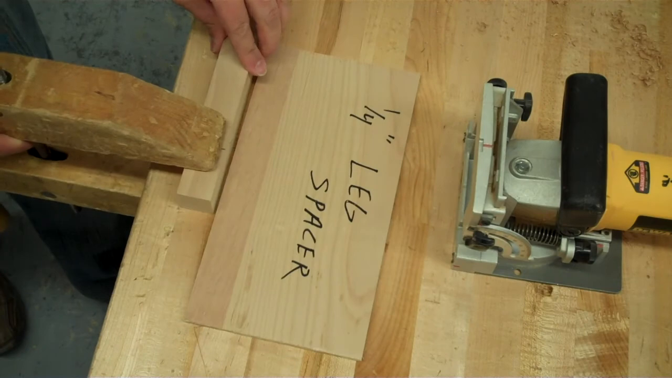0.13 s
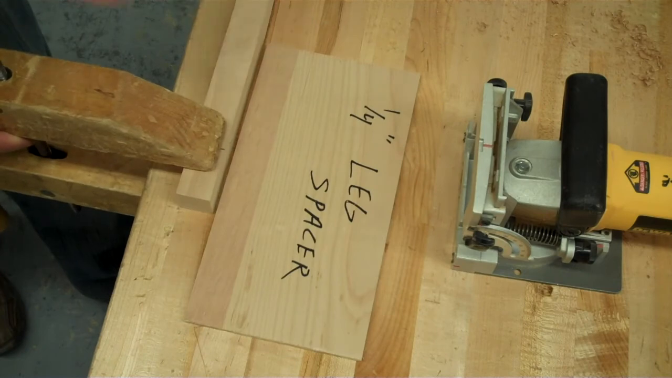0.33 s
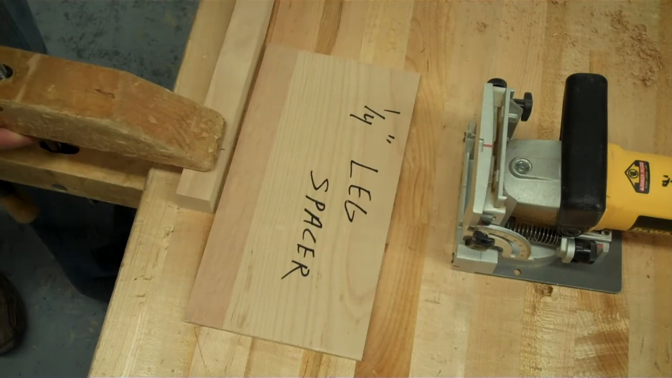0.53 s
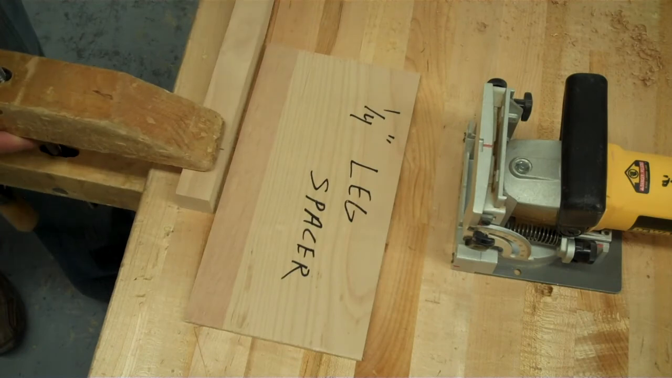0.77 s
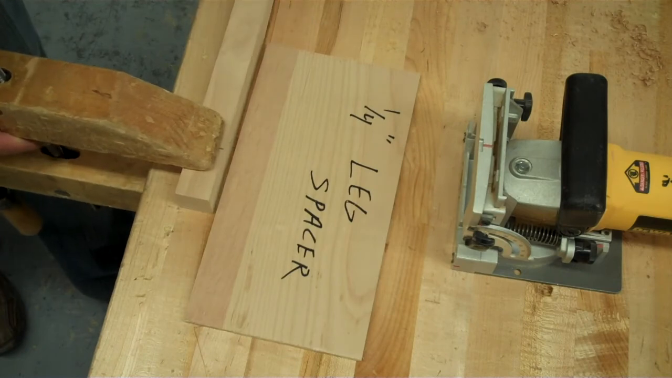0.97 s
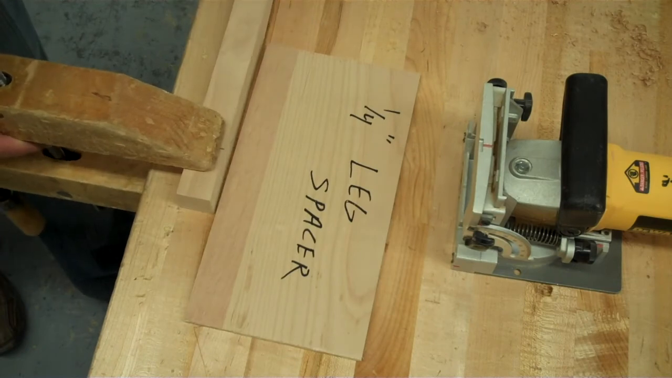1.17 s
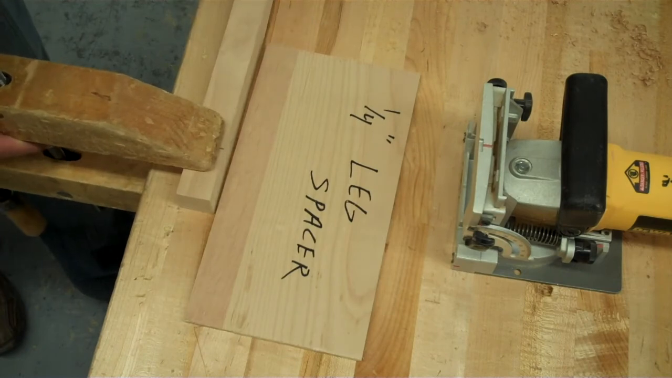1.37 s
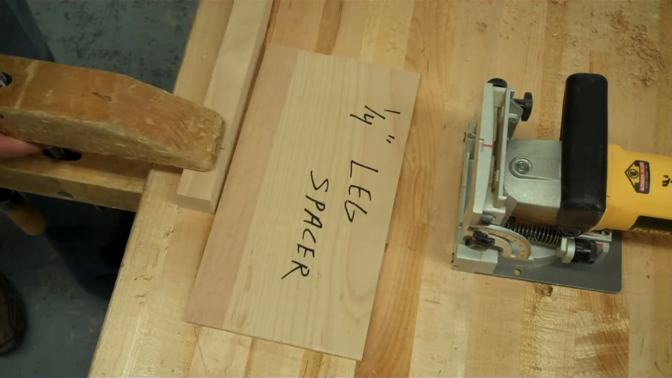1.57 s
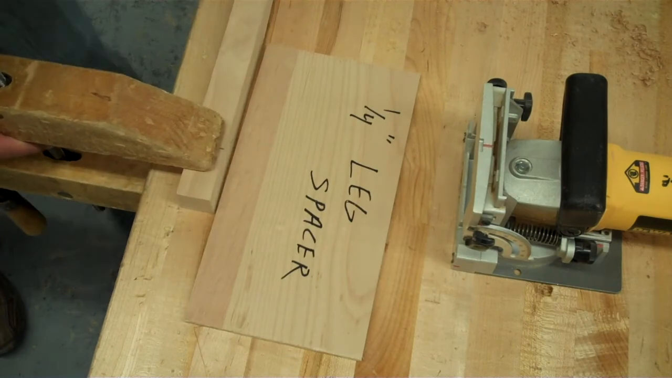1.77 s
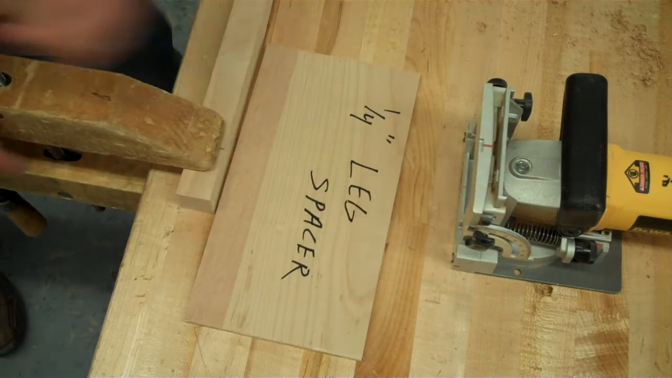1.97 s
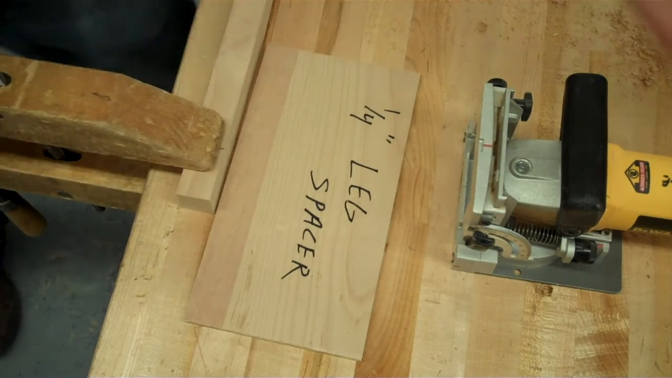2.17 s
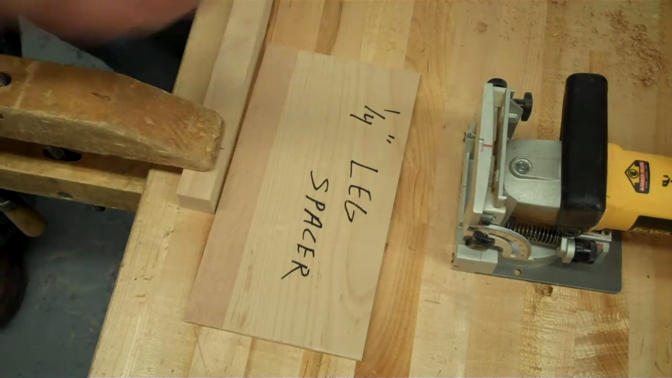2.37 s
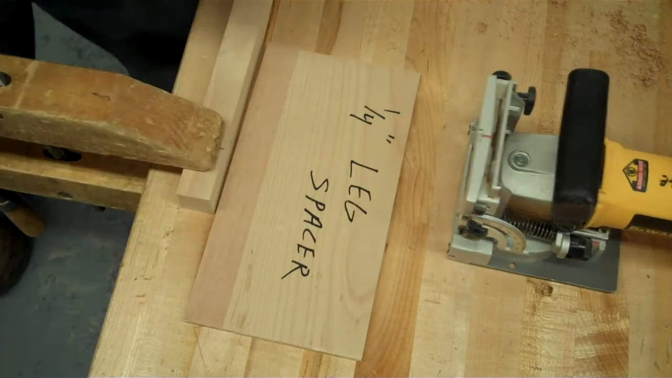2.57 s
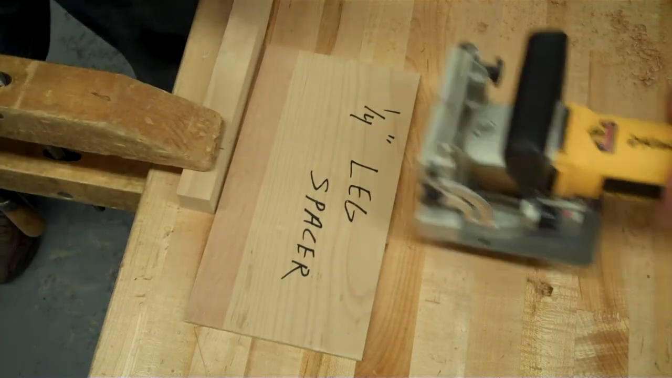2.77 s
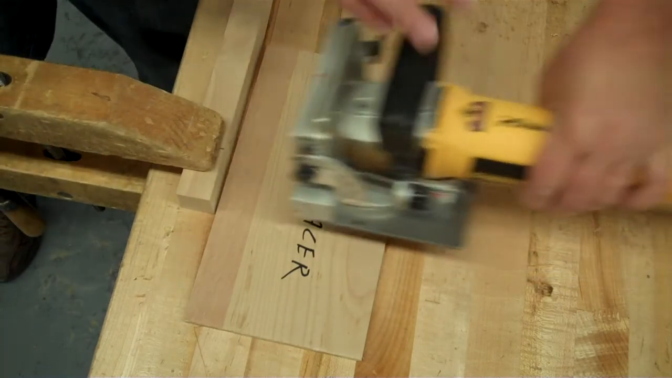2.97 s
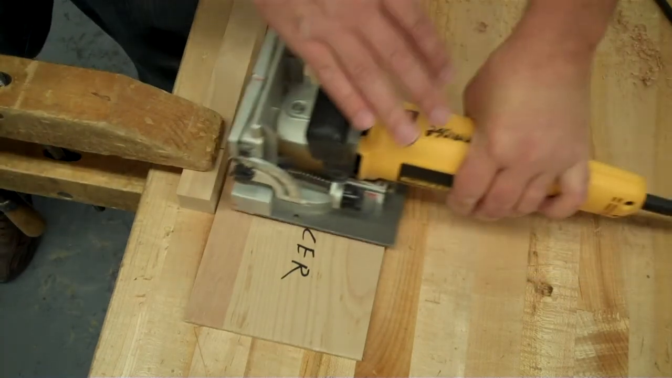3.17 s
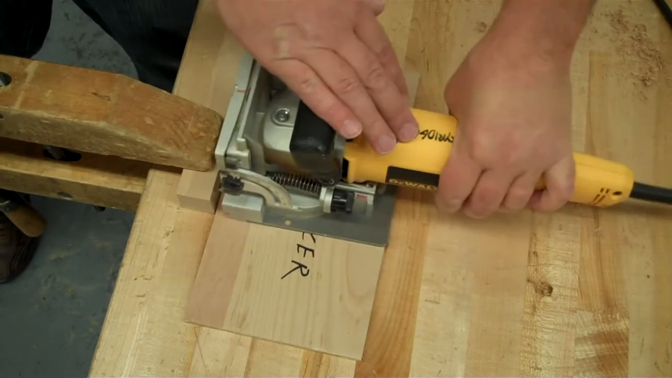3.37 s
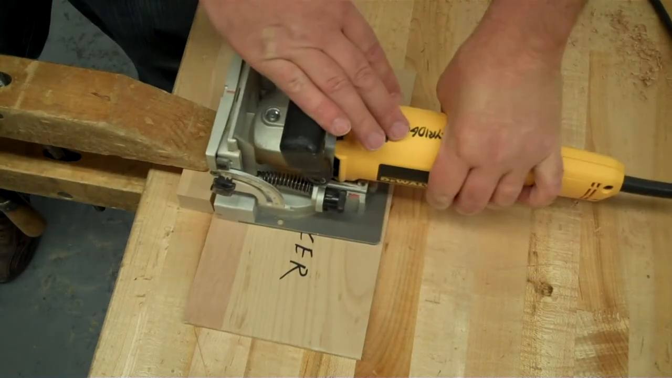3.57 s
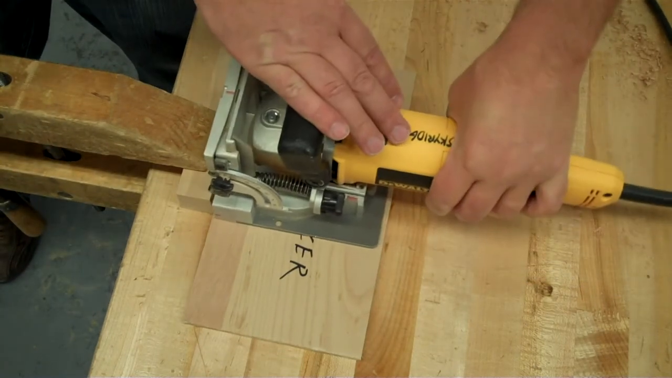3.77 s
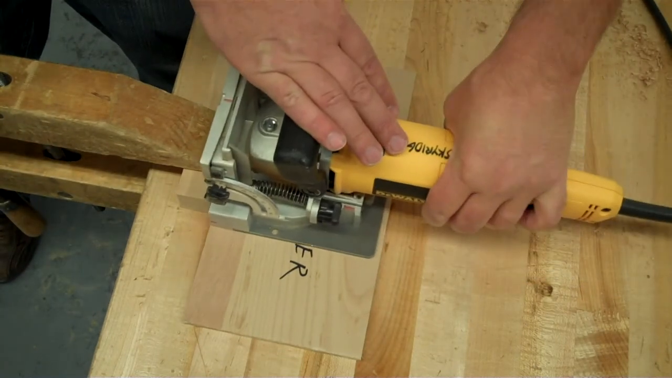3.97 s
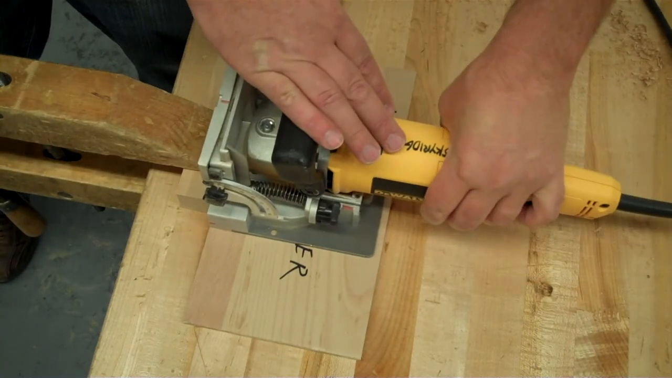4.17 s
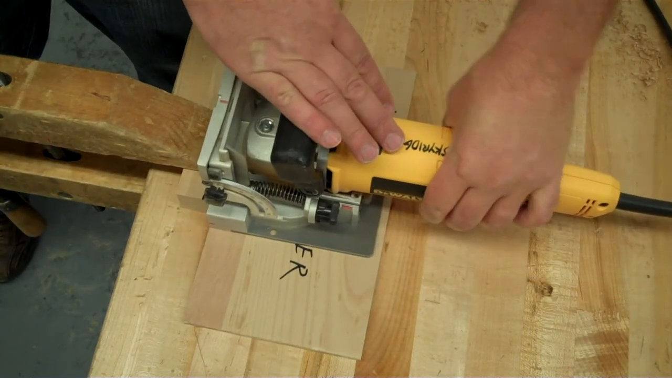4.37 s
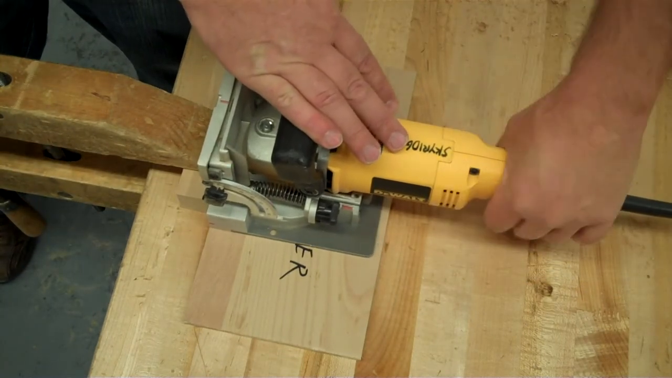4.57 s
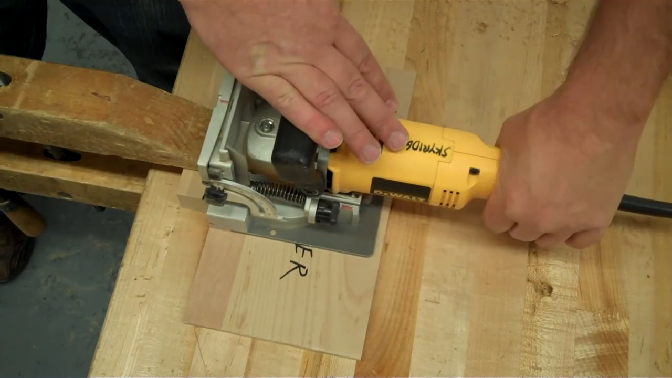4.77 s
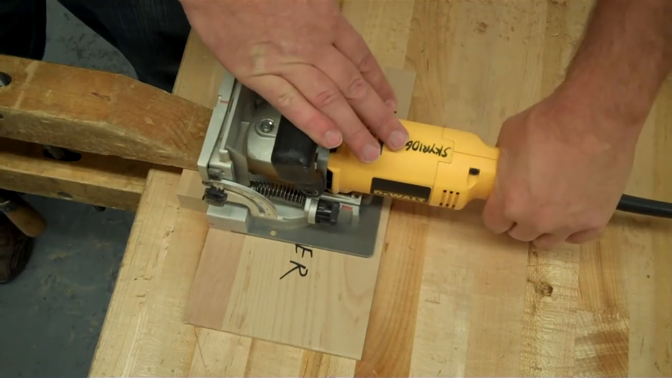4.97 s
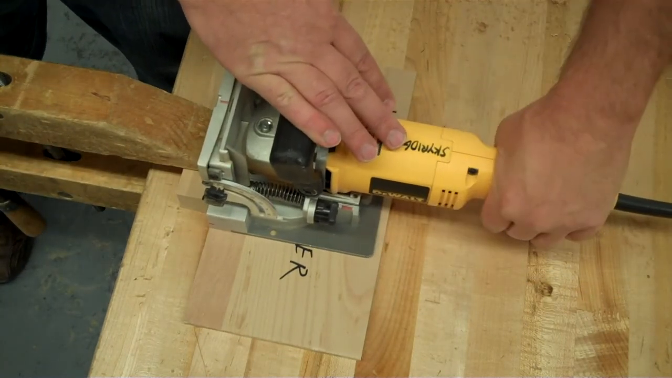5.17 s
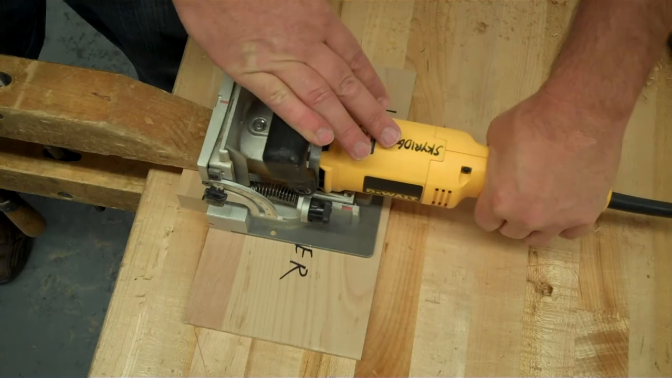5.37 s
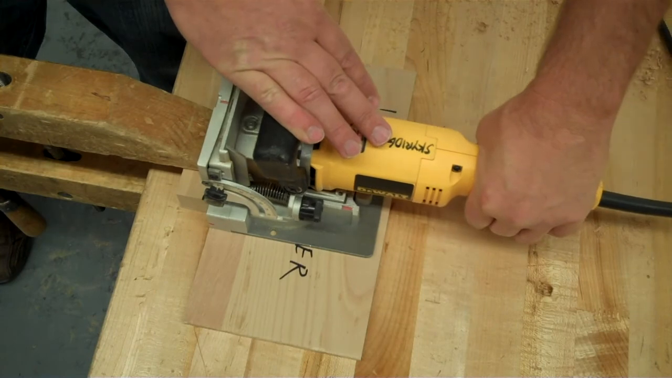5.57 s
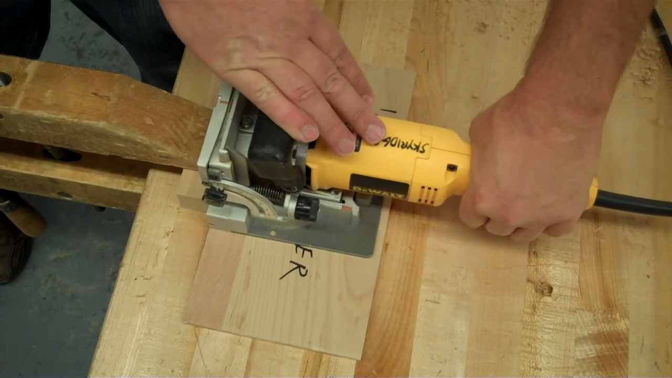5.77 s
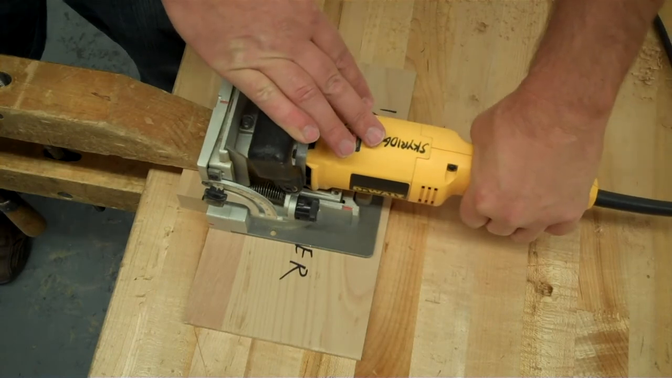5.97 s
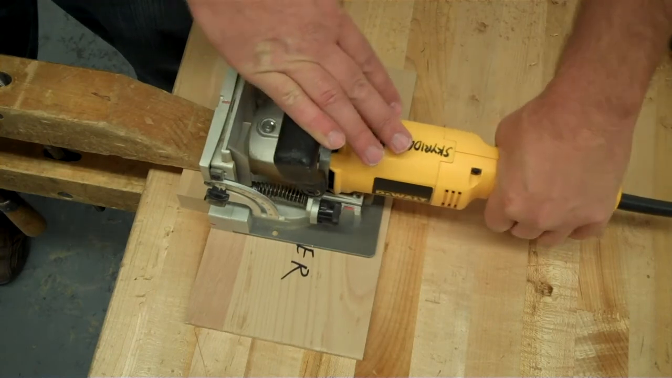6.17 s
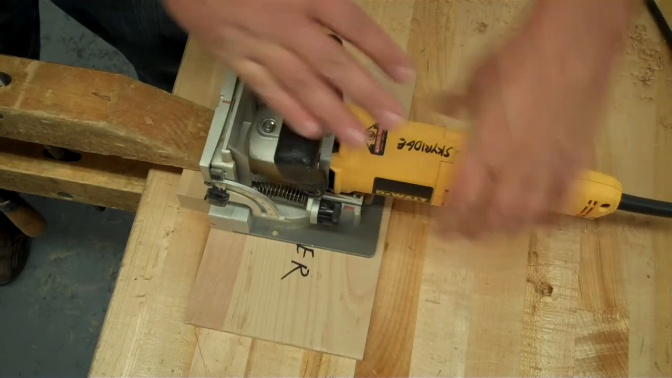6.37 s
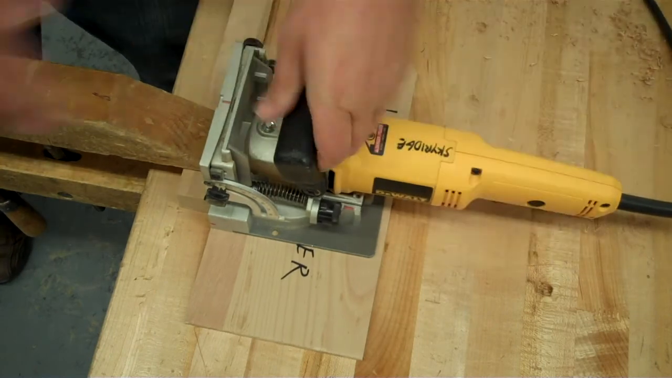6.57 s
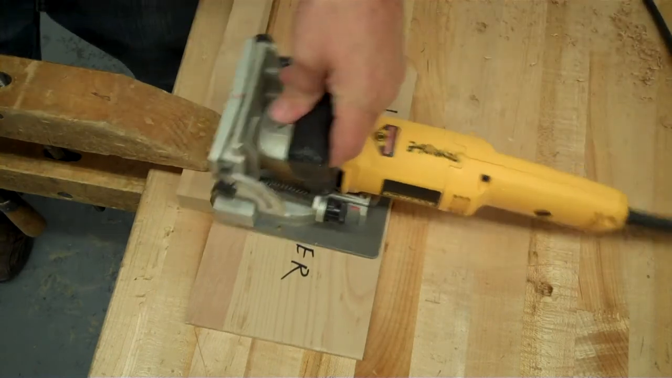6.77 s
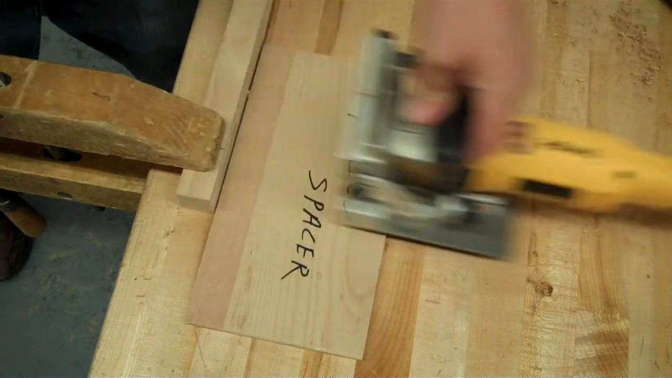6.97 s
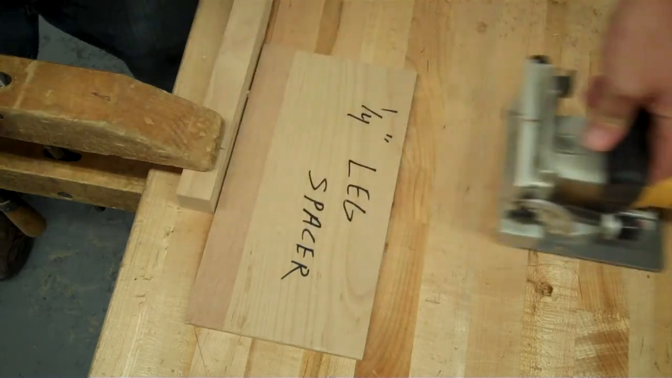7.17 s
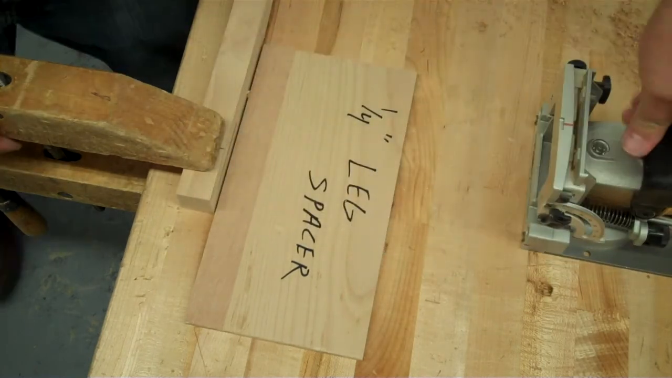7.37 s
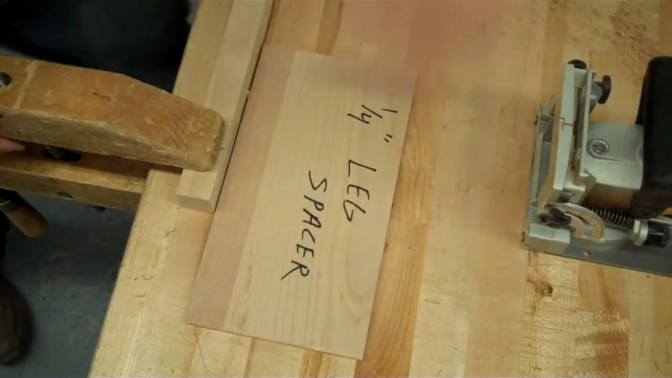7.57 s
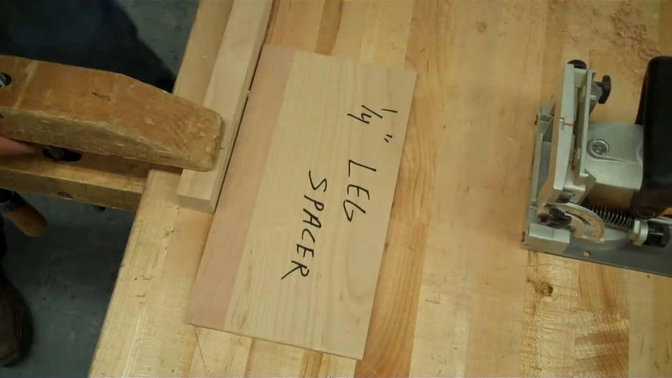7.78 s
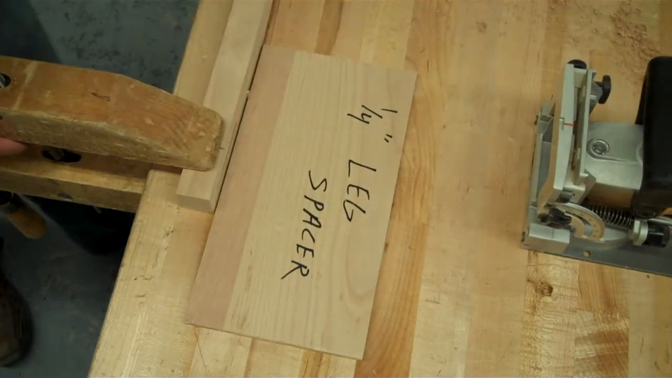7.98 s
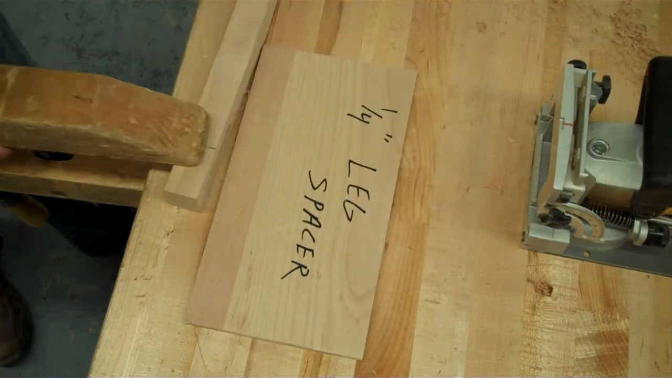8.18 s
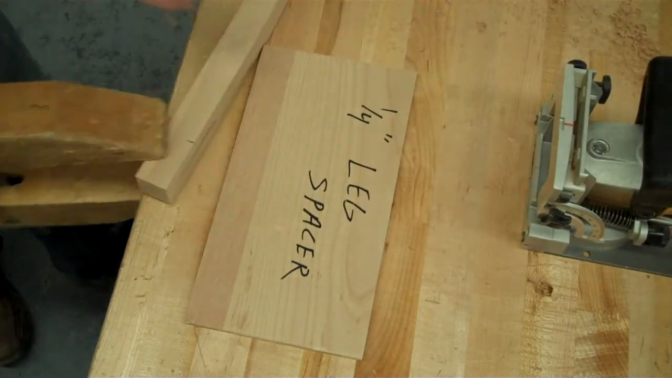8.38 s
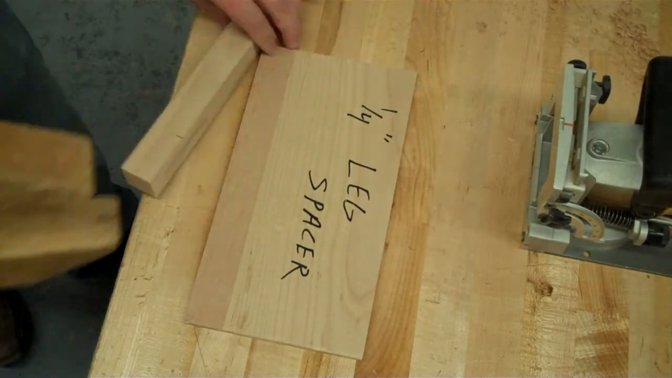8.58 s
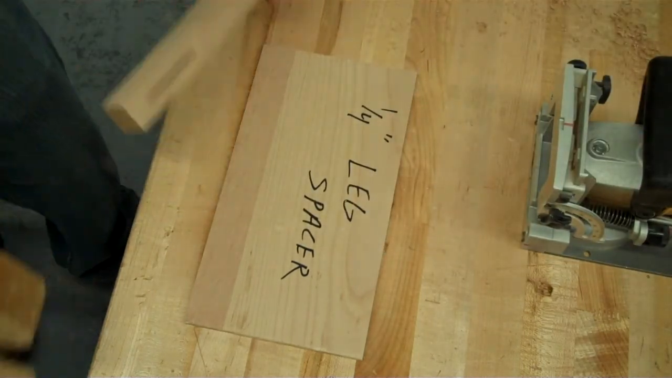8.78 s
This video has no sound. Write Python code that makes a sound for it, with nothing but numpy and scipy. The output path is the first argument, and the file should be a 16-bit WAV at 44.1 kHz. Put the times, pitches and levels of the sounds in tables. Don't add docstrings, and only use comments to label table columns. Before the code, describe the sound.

In a humming workshop, light wood knocks and sliding precede a plate joiner snapping on, whining and growling through hardwood, then coasting down in metallic rattle.

```python
import sys
import numpy as np
from scipy import signal
from scipy.fft import rfft, irfft, next_fast_len
from scipy.io import wavfile
from scipy.ndimage import uniform_filter1d

SR = 44100
rng = np.random.default_rng(int(sys.argv[2]) if len(sys.argv) > 2 else 0)


def gain_from_db(level_db):
    decades = np.asarray(level_db, float) / 20
    return 10 ** decades


def unload_audio(sound):
    columns = np.transpose(np.atleast_2d(sound))
    steps = np.round(np.clip(columns, -1, 1) * 32767)
    wavfile.write(sys.argv[1], SR, steps.astype(np.int16))


N = 388942
T = np.arange(N) / SR
HZ = np.maximum(np.fft.rfftfreq(next_fast_len(N, True), 1 / SR), 1)

ON_S, SWITCH_OFF_S = 4.936, 6.315
MAINS_PULSE_HZ, FIRST_PULSE_S = 120, 4.9785

# (time [s], mesh pitch [Hz], tooth load [dB])
MESH = [(4.98, 1927, -4), (5.075, 3780, -1), (5.115, 4120, 0), (5.2, 4740, 3), (5.3, 5224, 1.5),
        (5.385, 5525, 1.5), (5.48, 5570, 1), (5.545, 5493, 1), (5.625, 5190, -4), (5.73, 4412, 10),
        (5.85, 4854, -14), (5.97, 5284, 0), (6.19, 5817, 2.5), (6.315, 6076, -2.5), (6.73, 5117, -0.5),
        (7.25, 3868, -10), (7.8, 2755, -1.5), (8.82, 1120, -22)]
# (time [s], peak level [dB])
EARLY_RATTLE = [(6.442, -23), (6.47, -14), (6.4871, -19), (6.5187, -30), (6.5938, -23), (6.6283, -20),
                (6.6469, -19), (6.6718, -8), (6.6954, -10), (6.7178, -13), (6.7416, -12), (6.762, -10.5),
                (6.775, -14), (6.8166, -13), (6.7924, -11), (6.8438, -10), (6.868, -11.5), (6.892, -9.5),
                (6.9056, -12.5), (6.9253, -17), (6.95, -12), (6.9662, -14), (6.987, -9), (7.0034, -16),
                (7.0324, -14), (7.0569, -6.5), (7.0787, -8), (7.1326, -10), (7.1574, -8), (7.172, -7),
                (7.199, -18)]
# (frequency [Hz], level [dB], t60 [s])
HOUSING = [(1052, -5, 0.028), (1660, -14, 0.074), (2008, -4.5, 0.058), (2380, 6.5, 0.0046),
           (2940, 3, 0.0095), (3170, 7.5, 0.0053), (4610, -6, 0.027), (5480, 5.5, 0.0062),
           (5830, 6.5, 0.016), (6160, 6, 0.019), (6480, 0.5, 0.029), (7420, -3, 0.046), (7700, -5, 0.076),
           (8260, -2, 0.02), (9600, -10.5, 0.037), (9590, -6, 0.038), (12000, -22, 0.038)]
# (frequency [Hz], likeness [-1..1])
ROOM_ALIKE = [(60, 0.81), (130, 0.97), (290, 0.97), (630, 0.87), (1390, 0.59), (3050, 0.22), (6690, 0.041),
              (14700, -0.85)]
TOOL_ALIKE = [(60, 0.64), (130, 0.61), (290, 1), (630, 1), (1390, 1), (3050, 1), (6690, 0.5), (14700, 0.43)]
# (frequency [Hz], balance [dB])
ROOM_SIDE = [(60, -2), (180, 0.5), (540, -0.5), (1630, 2), (4890, -1), (14700, 18.5)]
RUN_SIDE = [(60, -7), (240, -3.5), (940, 0), (3700, 0), (6200, -1), (7300, 7), (8800, 20), (14700, 26)]
COAST_SIDE = [(60, -10), (99, -4), (160, 4), (270, 0), (440, 5), (730, 13), (1210, 0.5), (1990, -2),
              (3280, 6.5), (5400, -6), (8900, 17), (14700, 35.5)]


def in_time(rows):
    s, *columns = np.transpose(rows)
    return [np.interp(T, s, c) for c in columns]


def at_hz(points, hz):
    table_hz, values = np.array(points).T
    return np.interp(np.log(hz), np.log(table_hz), values)


def rms_one(x):
    return x / np.sqrt(np.mean(x ** 2) + 1e-20)


def band(x, low_hz, high_hz):
    sos = signal.butter(3, [low_hz, high_hz], "band", fs=SR, output="sos")
    return rms_one(signal.sosfilt(sos, x))


def drift(rate):
    r = np.exp(-80 * np.pi * rate / SR)
    slow = signal.lfilter([1], [1, -2 * r, r * r], rng.standard_normal(N // 40 + 2002))[2000:]
    return np.interp(np.arange(N) / 40, np.arange(len(slow)), rms_one(slow))


def noise(colour, alike, balance, modes=(), lift=0):
    size = next_fast_len(N, True)
    mid, side = rfft(rng.standard_normal((2, size)))
    c, sign = np.clip(at_hz(alike, HZ), -1, 1), np.array([[1], [-1]])
    pair = np.sqrt(1 + c) * mid + sign * np.sqrt(1 - c) * side
    pair = pair * gain_from_db(sign * at_hz(balance, HZ) / 2)
    peaks = 1 + lift * sum(gain_from_db(2 * db) * t60 / (1 + ((HZ - hz) * t60 / 1.1) ** 2) for hz, db, t60 in modes)
    return rms_one(irfft(pair * gain_from_db(at_hz(colour, HZ)) * np.sqrt(peaks), size)[:, :N])


def ring(clicks, hz, t60):
    r, w = gain_from_db(-60 / (t60 * SR)), 2 * np.pi * hz / SR
    return signal.lfilter([0, np.sin(w)], [1, -2 * r * np.cos(w), r * r], clicks + 1e-18)


def burst(clicks, rise_s, t60):
    a, r = np.exp(-1 / (rise_s * SR)), gain_from_db(-60 / (t60 * SR))
    fall = signal.lfilter([1], [1, -r], clicks + 1e-18)
    return signal.lfilter([1 - a], [1, -a], fall)


def switch():
    return np.clip((T - ON_S) / 0.00081, 0, 1)


def since_on():
    return np.maximum(T - ON_S, 0)


def cut(late_s=0):
    deepest_s, half_s = 5.73, 0.17
    return np.exp(-((T - deepest_s - late_s) / half_s) ** 2)


def lost_speed():
    free_mesh_hz = 5550
    return np.minimum(20 * np.log10(in_time(MESH)[0] / free_mesh_hz), 0) * (T > SWITCH_OFF_S)


def slaps():
    # (time [s], peak level [dB])
    lone = [(4.9335, -7), (4.9375, 9.5), (4.942, -22), (5.3293, -5), (5.6032, -15), (5.6401, -14),
            (5.6855, -5), (5.7384, -21), (5.7703, -17), (5.7893, -16), (5.8062, -19), (5.8327, -15),
            (5.8796, -20), (5.8975, -6), (5.9404, -12), (6.0312, -8), (6.0647, -8), (7.215, -9),
            (7.399, -8), (7.874, -10), (8.159, -10), (8.3009, -8), (8.389, -5.5), (8.4, -7), (8.5707, -6),
            (8.663, -5.5), (8.705, -14), (8.74, -5), (8.778, -12), (8.817, -3.5)]
    # (time [s], peak level [dB])
    bounces = [(7.1983, -8.5), (7.2485, -9), (7.2716, -8), (7.2993, -5), (7.3242, -6.5), (7.341, -7),
               (7.3675, -8.5), (7.3849, -5.5), (7.4253, -10.5), (7.4395, -7.5), (7.4555, -6.5),
               (7.4737, -7.5), (7.4972, -7.5), (7.5243, -8), (7.552, -7), (7.576, -10), (7.6043, -8.5),
               (7.6294, -8), (7.658, -8), (7.6846, -10.5), (7.7132, -8), (7.7401, -8.5), (7.765, -6),
               (7.7895, -8), (7.8151, -7), (7.8454, -13.5), (7.8584, -5.5), (7.8928, -12), (7.9218, -5.5),
               (7.9474, -7.5), (7.9784, -8.5), (8.0085, -9.5), (8.0375, -7), (8.0651, -12), (8.0857, -8),
               (8.1136, -7.5), (8.1376, -9), (8.168, -6.5), (8.1984, -7), (8.223, -9), (8.253, -8.5),
               (8.2812, -8), (8.3199, -9), (8.3463, -4.5), (8.3767, -8), (8.428, -8), (8.458, -8.5),
               (8.4804, -9), (8.5029, -7.5), (8.5291, -7), (8.5543, -11), (8.5872, -9.5), (8.6097, -10.5),
               (8.6304, -10.5), (8.647, -10), (8.6912, -7), (8.7185, -16.5), (8.7466, -16), (8.7727, -8),
               (8.7967, -12.5)]
    return np.vstack([lone, np.add(bounces, [0, 3.5]), np.add(EARLY_RATTLE, [0, 4.5])]).T


def whine():
    # (frequency [Hz], level [dB])
    mesh_response = [(2250, -33), (2650, -30.5), (3240, -26), (3340, -38), (3560, -34), (3800, -25.5),
                     (4000, -42), (4500, -53), (4800, -32), (5090, -21.5), (5870, -13.5)]
    # (frequency [Hz], level [dB])
    octave_response = [(4300, -50), (4600, -39), (5050, -35), (5400, -37), (5560, -50), (6000, -45),
                       (6500, -39), (7500, -40), (8400, -36), (9600, -42), (10800, -42), (12100, -45)]
    # (frequency [Hz], level [dB])
    tick_response = [(1800, -24), (2400, -13), (2750, -4), (3300, -3), (3800, -24), (5100, -20), (5600, -6),
                     (6300, -4), (7000, -14), (8200, -28), (9500, -70)]
    # (multiple of mesh pitch [ratio], level [dB])
    tick_orders = [(1.9, -3.5), (3.8, -4)]
    # (multiple of mesh pitch [ratio], level [dB], start [s], end [s])
    shaft_orders = [(.046, -43, 5.5, 6.2), (.08, -35, 5.57, 5.69), (.07, -39, 5.28, 5.38),
                    (.09, -37, 5.07, 5.14), (.046, -43, 5.7, 5.8), (.078, -52, 7.65, 7.95),
                    (.142, -37, 6.15, 6.72), (.142, -43, 6.8, 7.1), (.142, -45, 7.2, 7.4),
                    (.284, -44, 6.35, 6.7), (.284, -40, 7.3, 7.6), (.426, -47, 7.45, 7.75),
                    (.923, -32, 5.36, 5.56), (.923, -35, 5.03, 5.06), (.923, -22, 5.095, 5.135),
                    (.923, -29, 5.18, 5.3), (.855, -33, 5.33, 5.6), (.923, -31, 5.63, 5.98),
                    (.923, -31, 6.04, 6.3), (.95, -33, 5.82, 6.05)]
    octave_powered_db = -3
    beat_share, beat_fade_s = .85, .7
    slap_load = 1.2

    hz, load_db = in_time(MESH)
    hz = uniform_filter1d(hz, size=1600)
    turn = 2 * np.pi * np.cumsum(hz * (1 + 0.000987 * drift(21.3))) / SR
    powered = T < SWITCH_OFF_S
    pulses = np.cos(2 * np.pi * MAINS_PULSE_HZ * (T - FIRST_PULSE_S))
    beat = beat_share * pulses * np.exp(-since_on() / beat_fade_s) * powered

    s, db = slaps()
    coasting = s > SWITCH_OFF_S
    blows = np.zeros(N)
    blows[(s[coasting] * SR).astype(int)] = gain_from_db(db[coasting])

    mesh_db = load_db + at_hz(mesh_response, hz)
    mesh_db = mesh_db + 20 * np.log10(1 + beat + slap_load * burst(blows, .001, .06))
    mesh_db = mesh_db + 0.51 * drift(5.4) + 0.55 * drift(29) + 2.8 * drift(510)
    octave_db = at_hz(octave_response, 2 * hz) + octave_powered_db * powered
    octave_db = octave_db + 3 * drift(35) + 1.7 * drift(300)
    lines = [(1, mesh_db), (2, octave_db)]

    tick_db = 20 * np.log10(abs(burst(blows, 0.00042, 0.013)) + 1e-9)
    lines += [(k, db + tick_db + at_hz(tick_response, k * hz)) for k, db in tick_orders]

    waver_db = 1.5 * drift(20) + 3 * drift(150) + 20 * np.log10(1 + beat)
    for n, (k, db, t0, t1) in enumerate(shaft_orders):
        fade_db = np.interp(T, [t0 - .1, t0, t1, t1 + .1], [-40, 0, 0, -40])
        own_waver_db = min(1, .3 + k) * np.roll(waver_db, 2205 * (n % 3))
        lines.append((k, db + fade_db + own_waver_db))

    out = np.zeros((2, N))
    for k, db in lines:
        on = (T > MESH[0][0]) & (db > -75)
        pan_db = np.where(T[on] < 7, at_hz(RUN_SIDE, k * hz[on]), at_hz(COAST_SIDE, k * hz[on])) / 2
        tone = np.sin(k * turn[on] + [[0], [0.75 * k]])
        out[:, on] += np.sqrt(2) * gain_from_db(db[on] + [pan_db, -pan_db]) * tone
    return out


def whir():
    # (level [dB], share of effort [dB/dB], share of lost speed [dB/dB], change in the cut [dB])
    ranges = [
        (-27.5, 0.41, 0.72, -6.5),
        (-25, 1.7, 0.73, -5),
        (-20, 3.1, 1, -2),
        (-27.5, 4.7, 0.53, -4),
    ]
    edges_hz = [450, 1500, 4500, 7000, 16000]
    # (frequency [Hz], density [dB per Hz])
    colour = [(180, -56), (300, 4), (371, -14), (467, -4), (841, -1), (2100, -8), (3550, -9.5),
              (6000, -10.5), (6950, -9), (7540, -2), (13800, -18.5), (15000, -59)]
    # (time [s], level [dB])
    effort_curve = [(4.95, -0.5), (5.05, 0.5), (5.12, 1), (5.46, 0.5), (5.9, 1), (6.25, -0.5), (7.1, 0),
                    (7.2, 0.5), (7.46, -1.5)]
    hiss_top_fades_s = (6.8, 7.4)
    hiss_top_edge_hz, hiss_top_db, hiss_top_loss_db = 10400, -6, -19
    hammer_db, hammer_fade_s, hammer_left_db = 14, .12, 1.5
    uneven_db = .6
    swell_db, swell_early_s = -24.5, 0.09

    raw = noise(colour, TOOL_ALIKE, RUN_SIDE, HOUSING, lift=110)
    below = signal.sosfiltfilt(signal.butter(4, hiss_top_edge_hz, fs=SR, output="sos"), raw)
    raw = below + (raw - below) * gain_from_db(hiss_top_db + np.interp(T, hiss_top_fades_s, [0, hiss_top_loss_db]))

    cycle = (T - FIRST_PULSE_S) * MAINS_PULSE_HZ
    strength = rng.uniform(.5, 1.5, 2000)[np.floor(cycle).astype(int) % 2000]
    pulse = strength * np.exp(-(cycle % 1) / 0.5) - .55
    beat_db = (hammer_db * np.exp(-since_on() / hammer_fade_s) + hammer_left_db) * pulse
    flutter_db = 1.06 * drift(120) + 0.48 * drift(6.7)

    effort, lost, depth = in_time(effort_curve)[0], lost_speed(), cut()
    out = np.zeros((2, N))
    for (db, work, slow, cut_db), low_hz, high_hz in zip(ranges, edges_hz, edges_hz[1:]):
        level_db = db + work * effort + slow * lost + cut_db * depth
        out += gain_from_db(level_db + uneven_db * drift(2.3)) * band(raw, low_hz, high_hz)
    hiss = band(rng.standard_normal(N), 8200, 9650)
    out += gain_from_db(swell_db) * hiss * cut(-swell_early_s) * gain_from_db([[5], [-9]])
    return out * gain_from_db(beat_db + flutter_db) * switch()


def rattle():
    # (frequency [Hz], density [dB per Hz])
    colour = [(180, -42), (300, 4), (1040, -3), (1470, 15.5), (2690, 12), (4120, -6.5), (6300, 3.5),
              (7670, 0), (8880, -21.5), (9640, -12), (10500, -33), (12100, -18), (15000, -61)]
    low_share_db, low_per_db = -25.5, 0.9754
    second_db, second_spread_db = -12, 4
    sharp_share = 2.6

    s, db = slaps()
    at = (s * SR).astype(int)
    luck = rng.normal(0, 1, (200, len(HOUSING) + 3))[:len(s)]
    low_db = low_share_db - low_per_db * lost_speed()[at] + 0.71 * luck[:, -3]
    late = at + (SR * (0.0031 + 0.00186 * abs(luck[:, -1]))).astype(int)
    late_db = second_db + second_spread_db * luck[:, -2]

    first = at.min() - 1
    crack = noise(colour, TOOL_ALIKE, COAST_SIDE)[:, first:]
    grit = rng.standard_normal(N - first)
    out = np.zeros((2, N))

    def train(level_db):
        clicks = np.zeros(N + SR)
        clicks[at], clicks[late] = gain_from_db(level_db), gain_from_db(level_db + late_db)
        return clicks[first:N]

    for low_hz, high_hz, level_db in ((300, 4000, db + low_db - 3.0), (4000, 16000, db - 11.5)):
        out[:, first:] += band(crack, low_hz, high_hz) * burst(train(level_db), 0.00034, 0.023)
    for k, (hz, mode_db, t60) in enumerate(HOUSING):
        edge = train(db + (low_db + 13.5) * (hz < 4000) + mode_db - 32.0 + 2.3 * luck[:, k])
        scuff = burst(edge, 0.0005, 0.006) * np.roll(grit, 997 * k)
        tone = ring(scuff + sharp_share * edge * (-1) ** k, hz, t60)
        pan_db = at_hz(COAST_SIDE, hz) / 2
        out[:, first:] += [gain_from_db(pan_db) * tone, gain_from_db(-pan_db) * np.roll(tone, k % 3)]
    return signal.sosfilt(signal.butter(4, [350, 12500], "band", fs=SR, output="sos"), out)


def early_clicks():
    hz, t60, until_s = 4820, .011, 6.93
    s, db = np.transpose([row for row in EARLY_RATTLE if row[0] < until_s])
    clicks = np.zeros(N)
    clicks[(s * SR).astype(int) + 40] = gain_from_db(db + 1)
    return ring(clicks, hz, t60) - .6 * ring(clicks, 1.2 * hz, t60 / 2)


def kicks():
    # (time [s], peak level [dB])
    pulse_kicks = [(4.9534, -9), (4.961, -3), (4.9784, -2.5), (4.9852, -2), (4.9948, -3), (5.0034, -8),
                   (5.013, -7), (5.021, -1), (5.029, -10), (5.0364, -13), (5.046, -9), (5.0534, -8),
                   (5.062, -4), (5.072, -5), (5.083, -5), (5.0894, -5), (5.0966, -4), (5.188, -7),
                   (5.197, -7), (5.231, -15), (5.242, -6)]
    # (frequency [Hz], density [dB per Hz])
    colour = [(600, -37), (1200, -6), (2500, -3.5), (4300, 4.5), (5300, 7), (6300, 2), (7200, -19.5),
              (10000, -9), (15000, -47)]
    s, db = np.transpose(pulse_kicks)
    clicks = np.zeros(N)
    clicks[(s * SR).astype(int)] = gain_from_db(db - 5)
    return noise(colour, TOOL_ALIKE, RUN_SIDE) * burst(clicks, 0.00023, 0.024)


def bench(modes):
    kick_db, kick_fade_s = 14.5, 0.85
    cut_db, cut_late_s = 6.5, 0.19
    hum_db, hum_fade_db_per_s = -30.5, 82

    shake = noise([(60, -18.0), (150, -14.5), (500, 9)], TOOL_ALIKE, RUN_SIDE, modes, lift=330)
    shake = band(shake, 97, 477)
    kick = np.exp(-(since_on() / kick_fade_s) ** 2)
    level_db = -45.5 + kick_db * kick + cut_db * cut(cut_late_s) + 2.0 * drift(7.9)
    hum = gain_from_db(hum_db - hum_fade_db_per_s * since_on()) * np.sin(2 * np.pi * MAINS_PULSE_HZ * T)
    return (gain_from_db(level_db) * shake + hum) * switch()


def knocks(modes):
    # (time [s], peak level [dB], bright centre [Hz], low thump [dB], t60 [s])
    hits = [(0.409, -41, 1530, -41, .04), (0.515, -37, 1950, -43, 0.03), (0.594, -50, 1520, -38, 0.037),
            (0.641, -57, 1520, -42, 0.037), (0.971, -36.5, 1510, -40, 0.054),
            (1.061, -30.5, 880, -36.5, 0.053), (1.248, -46, 1540, -50, 0.05),
            (1.744, -17.5, 2430, -43, 0.012), (1.854, -27, 4500, -54, 0.013), (2.591, -16, 920, -28, 0.059),
            (2.596, -14, 2500, -26.5, 0.027), (2.674, -36, 2600, -63, .02), (2.62, -37, 900, -35, 0.055),
            (2.672, -31, 1090, -31, 0.06), (3.012, -36, 7550, -61, 0.033), (3.22, -23.5, 2430, -53, 0.034),
            (3.221, -22, 1150, -59, 0.04), (3.5, -43, 960, -45, .04), (3.814, -31, 8700, -63, 0.024),
            (3.903, -39, 7000, -60, .03), (4.111, -35, 7500, -60, .015), (4.136, -20, 3180, -54, 0.028),
            (4.148, -33, 6500, -58, .012), (4.336, -46, 1230, -38, 0.054), (4.839, -39, 2640, -52, 0.045),
            (4.935, 9, 2450, -24, 0.037), (7.191, -7.5, 1120, -21.5, 0.11), (7.301, -9, 1120, -33, 0.058),
            (7.323, -10, 1090, -39, 0.065), (7.95, -36, 1097, -31, 0.053), (8.53, -40, 1101, -32.5, 0.054)]
    size = 20000
    t = T[:size]
    out = np.zeros((2, N + size))
    for s, db, hz, thump_db, t60 in hits:
        mid, side = rng.standard_normal((2, size))
        fade = (1 - np.exp(-t / 0.0013)) * gain_from_db(-60 * t / max(t60, .005))
        tick = band(mid + 0.3 * side * [[1], [-1]], max(hz / 3.1, 300), min(hz * 2.77, 12000))
        rings = np.clip((1250 / hz) ** 1.9, 0, 1)
        body = band(side, hz / 1.104, hz * 1.08)
        tick = (1.1 - 0.44 * rings) * tick + 0.3 * rings * body
        clack = np.sin(2 * np.pi * hz * t) * 1.43 * rings * gain_from_db(-60 * t / 0.054)
        thump = np.zeros(size)
        for mode_hz, mode_db, mode_t60 in modes:
            strength = gain_from_db(mode_db + rng.normal(0, 1.5))
            tone = np.sin(2 * np.pi * (mode_hz * t + rng.random()))
            thump += strength * tone * gain_from_db(-60 * t / mode_t60)
        thump *= (1 - np.exp(-t / 0.0019)) ** 2
        i = round(s * SR)
        out[:, i:i + size] += gain_from_db(db - 5.0) * (tick + clack) * fade + gain_from_db(thump_db - 4.0) * thump
    return out[:, :N]


def pings():
    # (time [s], pitch [Hz], peak level [dB], t60 [s])
    notes_struck = [(0.516, 2010, -39, 0.029), (1.855, 4240, -32, .02), (1.854, 4870, -34, 0.021),
                    (2.596, 1940, -31, 0.059), (2.596, 2530, -30, 0.039), (2.597, 2940, -23.5, 0.026),
                    (2.673, 1970, -45, 0.079), (4.975, 1887, -4, 0.042)]
    out = np.zeros(N)
    for s, hz, db, t60 in notes_struck:
        t = np.maximum(T - s, 0)
        out += gain_from_db(db - 60 * t / t60) * (1 - np.exp(-t / 0.00038)) * np.sin(2 * np.pi * hz * t)
    return out


def slides():
    # (middle [s], half length [s], centre [Hz], level [dB])
    strokes = [(.45, 0.21, 6600, -57.5), (1.022, 0.064, 4100, -53), (1.338, 0.024, 8060, -46.5),
               (1.933, 0.11, 5360, -49.5), (2.025, 0.25, 2015, -55), (2.21, 0.11, 3820, -47.5),
               (2.439, 0.045, 7250, -38), (2.488, 0.22, 4860, -46), (2.743, 0.21, 6800, -54.5),
               (3.014, 0.065, 7630, -45), (3.205, 0.07, 7550, -45.5), (3.426, 0.12, 6800, -49.5),
               (3.933, 0.12, 8100, -47), (4.153, 0.037, 7550, -49.5), (4.514, 0.04, 5970, -46),
               (4.61, 0.042, 5400, -49)]
    raw = noise([(1000, 15), (9000, 8), (14000, -23)], ROOM_ALIKE, ROOM_SIDE)
    raw = raw * gain_from_db(1.9 * drift(120) + .9 * drift(22))
    out = np.zeros((2, N))
    for s, half_s, hz, db in strokes:
        near = abs(T - s) < 3 * half_s
        swell = np.exp(-((T[near] - s) / half_s) ** 2)
        out[:, near] += gain_from_db(db) * band(raw[:, near], hz / 1.51, hz * 2.0) * swell
    return out


def shop(x):
    size = next_fast_len(N + SR)
    hz = np.fft.rfftfreq(size, 1 / SR)
    t60 = 0.34 / (1 + hz / 6000)
    out = []
    for side in x:
        delays_s = rng.uniform(.006, .03, 10)
        loops = [gain_from_db(-60 * d / t60) * np.exp(-2j * np.pi * hz * d) for d in delays_s]
        response = sum((-1) ** k * g / (1 - g) for k, g in enumerate(loops))
        out.append(irfft(rfft(side, size) * response, size)[:N])
    return np.array(out)


def room_noise():
    # (frequency [Hz], density [dB per Hz])
    colour = [(12, -51), (20, -19), (189, 0.5), (278, -6), (357, -2), (409, -5), (889, -10.5), (966, -12),
              (1140, -14), (3090, -19.5), (5380, -23), (8160, -16), (9630, -30), (13400, -30.5),
              (15000, -26.5)]
    # (frequency [Hz], level [dB])
    hum_lines = [(119.5, -69), (200, -66.5), (239, -71.5), (318, -72), (360, -71.5), (958, -74.5),
                 (11795, -83)]
    duck_s = (5.4, 6.3, 7.0, 8.0)
    open_db, duck_db, recovered_db = 7.5, -2, 4

    air = noise(colour, ROOM_ALIKE, ROOM_SIDE) * gain_from_db(-53.5 - 2.5 + 0.25 * drift(28.0))
    hum = np.zeros(N)
    for hz, db in hum_lines:
        hum += np.sqrt(2) * gain_from_db(db + 2.0 * drift(2.9)) * np.sin(2 * np.pi * hz * T)
    return (air + hum) * gain_from_db(open_db + np.interp(T, duck_s, [0, duck_db, duck_db, recovered_db]))


def scene():
    # (frequency [Hz], level [dB], t60 [s])
    bench_modes = [(74.5, -7, 0.038), (113.5, -11, 0.17), (196, 3, 0.16), (258, -1.5, 0.072),
                   (373, 1, 0.061), (554, 3.5, 0.037), (647, -10.5, 0.16), (1120, 5.5, 0.029)]
    struck = rattle() + early_clicks() + kicks() + knocks(bench_modes) + pings()
    tool = whine() + whir() + bench(bench_modes)
    return tool + struck + gain_from_db(-20.5) * shop(struck) + slides() + room_noise()


def low_pass(x):
    return signal.sosfilt(signal.butter(12, 15280, fs=SR, output="sos"), x)


def record(dry):
    rounded = 1.02 * np.tanh(dry / 1.05)
    top = signal.sosfilt(signal.cheby2(10, 45, 15050, fs=SR, output="sos"), rounded)
    return low_pass(np.clip(top, -1, 1))


dry = scene()
out = record(dry)
unload_audio(out)
```